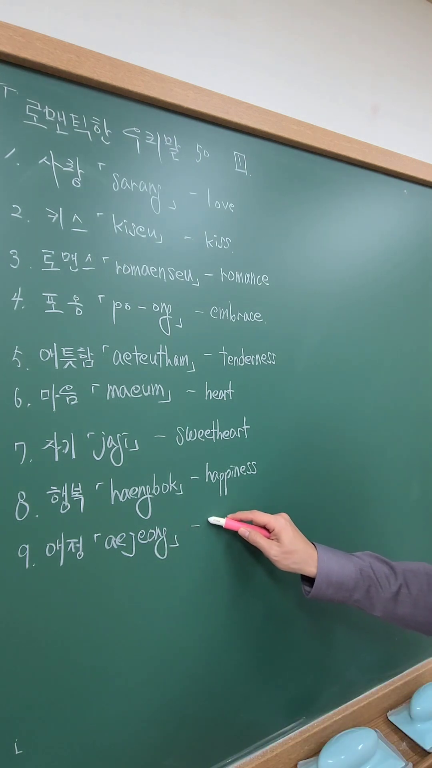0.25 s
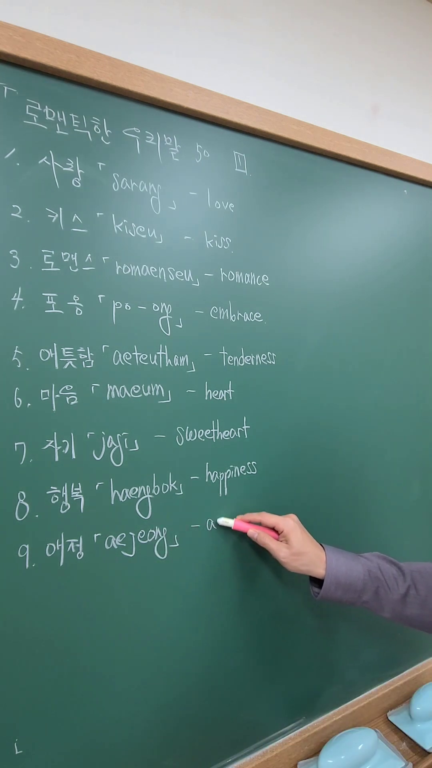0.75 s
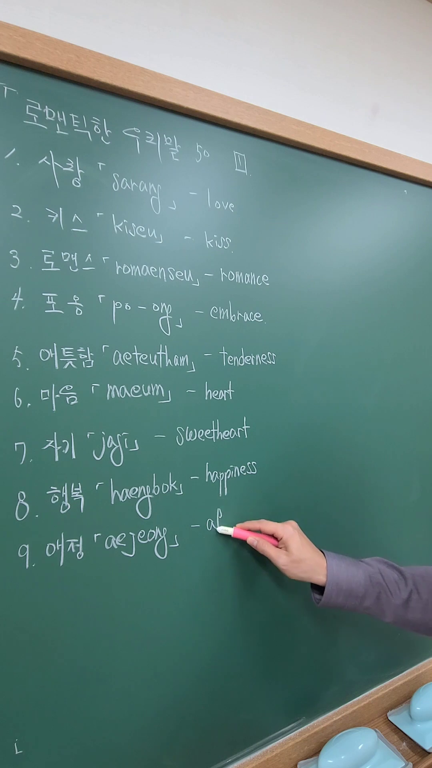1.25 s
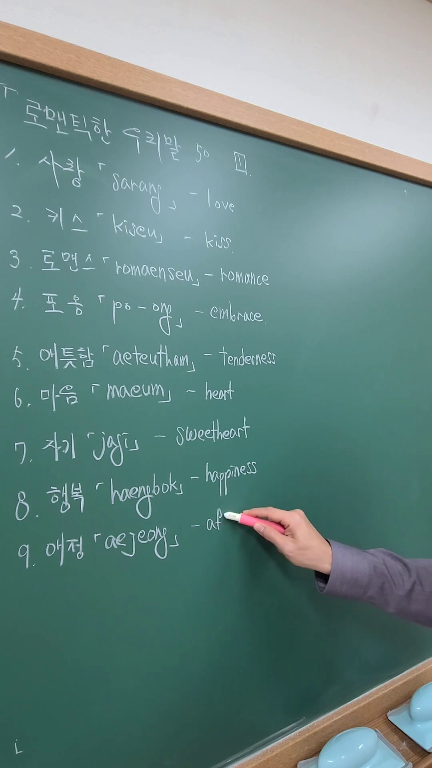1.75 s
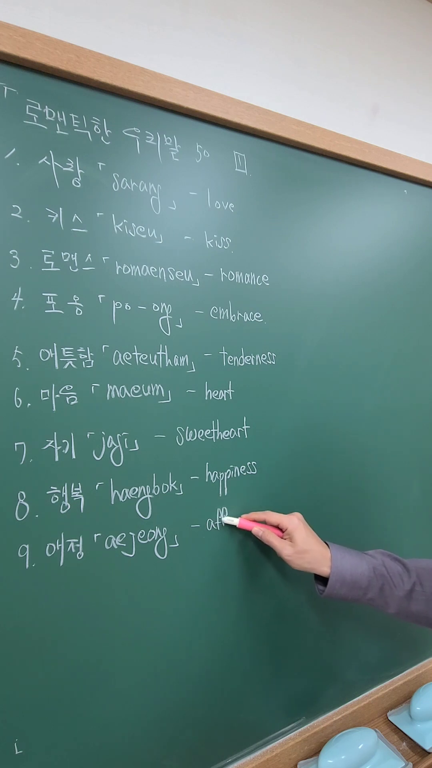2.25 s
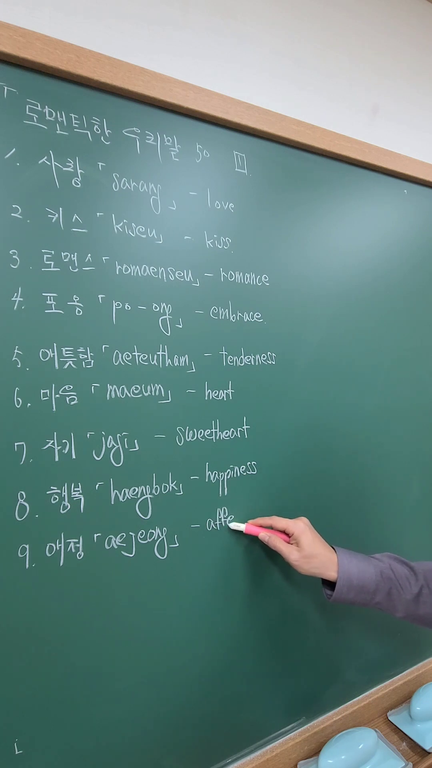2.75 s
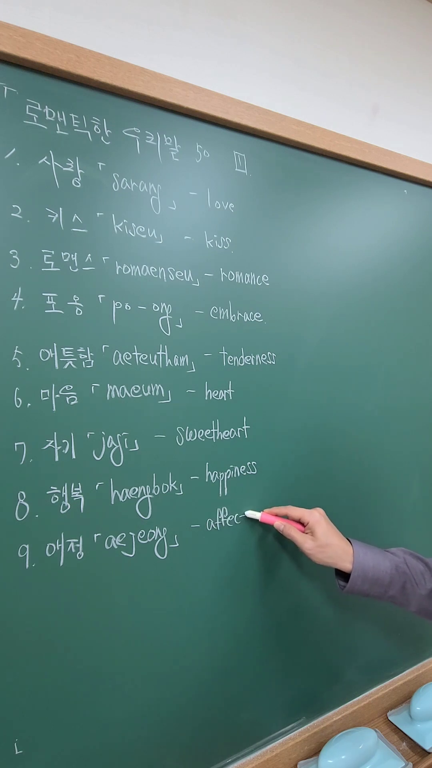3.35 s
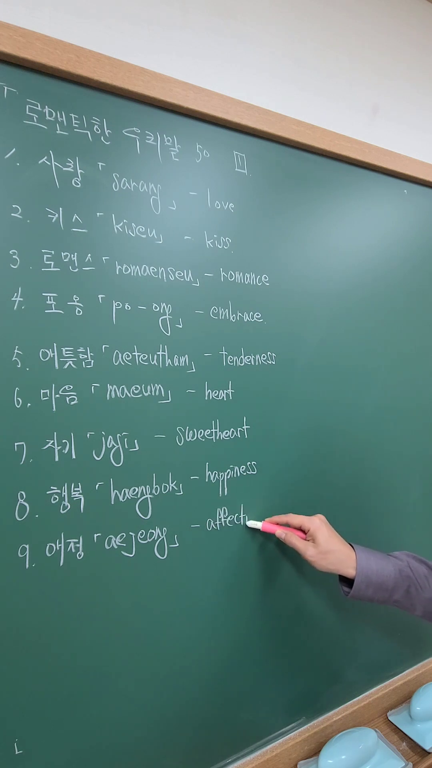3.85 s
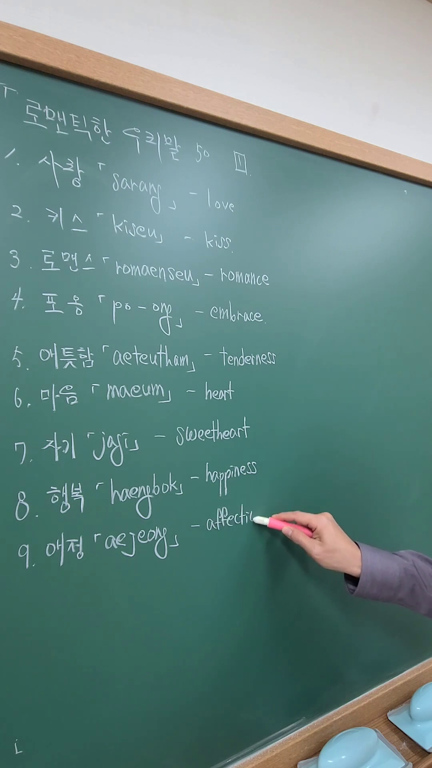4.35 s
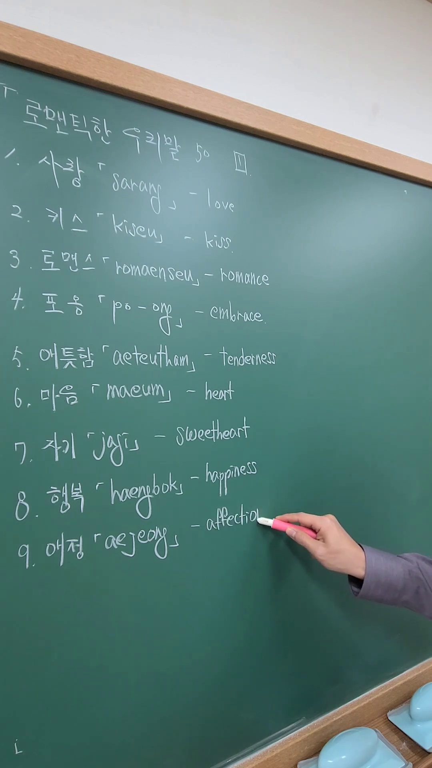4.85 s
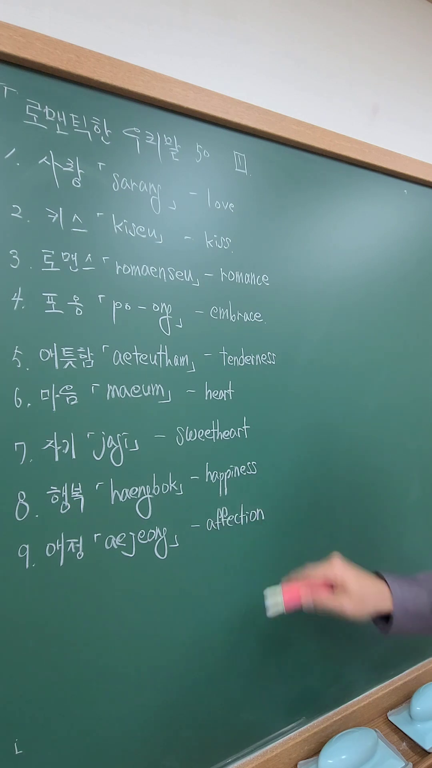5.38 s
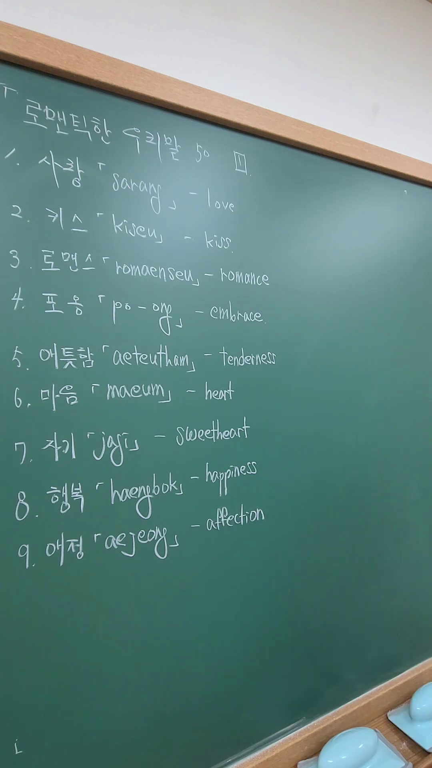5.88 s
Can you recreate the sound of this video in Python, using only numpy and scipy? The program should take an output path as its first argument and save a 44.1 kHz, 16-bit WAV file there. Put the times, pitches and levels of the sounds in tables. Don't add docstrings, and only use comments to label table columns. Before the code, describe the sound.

In a quiet, small-sounding room with an uneven low motor hum, chalk lands on a board in irregular taps, some crisp, some muted, with dry dusty scrapes between them. The panel answers briefly with a woody resonance. Finally the arm drops with a soft wide cloth rustle, a bright click and a duller one, leaving the hum. Close stereo pickup.

```python
import sys
import numpy as np
from scipy import signal
from scipy.fft import rfft, irfft, next_fast_len
from scipy.io import wavfile
from scipy.ndimage import uniform_filter1d, map_coordinates

SR = 44100
rng = np.random.default_rng(int(sys.argv[2]) if len(sys.argv) > 2 else 0)


def materialize(psi):
    bounded = np.clip(np.atleast_2d(psi).T, -1, 1)
    quanta = np.round(bounded * 32767).astype(np.int16)
    wavfile.write(sys.argv[1], SR, quanta)


def volts(x):
    e = np.asarray(x, float) / 20
    return 10 ** e


N = 269654


def unit(x):
    return x / np.sqrt(np.mean(x ** 2) + 1e-20)


def along(points, hz):
    f, v = np.transpose(points)
    return np.interp(np.log(hz + 1), np.log(f + 1), v)


def wobble(rate):
    knots = rng.standard_normal(int(N * rate / SR) + 4)
    return map_coordinates(knots, [np.arange(N) * rate / SR])


def filtered(x, response):
    n = x.shape[-1]
    m = next_fast_len(n + 8192)
    return irfft(rfft(x, m) * response(np.fft.rfftfreq(m, 1 / SR)), m)[..., :n]


def coloured(x, spectrum):
    return unit(filtered(x, lambda hz: volts(along(spectrum, hz))))


def add(track, s, sound):
    start = round(s * SR)
    sound = sound[..., max(-start, 0):]
    part = track[..., max(start, 0):][..., :sound.shape[-1]]
    part += sound[..., :part.shape[-1]]


def softened(x, bright_db):
    edge_hz = np.clip(9000 * volts(0.4 * (bright_db + 18.5)), 500, 20000)
    return signal.lfilter(*signal.butter(2, edge_hz, fs=SR), x)


# (f/Hz, t60/s)
DECAY = [(700, 0.53), (2000, 0.28), (5000, 0.19), (9000, 0.24), (15000, 0.24)]


def dying(spectrum, seconds, speed, channels):
    noise = coloured(rng.standard_normal((channels, round(seconds * SR))), spectrum)
    hz, t, z = signal.stft(noise, SR, nperseg=128)
    fade = volts(-60 * speed * t / along(DECAY, hz)[:, None])
    return signal.istft(z * fade, SR, nperseg=128)[1][:, :noise.shape[1]]


def walls(x, db):
    tail = dying([(100, -3.5), (15000, 0)], 0.073, speed=1.6, channels=2)
    tail = tail / np.linalg.norm(tail[0])
    late = np.pad(x, (220, 0))[None]
    return volts(db) * signal.fftconvolve(late, tail, axes=1)[:, :N]


# (f/Hz, width/Hz, level/dB)
STICK = [(2990, 310, -4), (3500, 130, 3), (3633, 33, 4), (3670, 440, -7), (4230, 230, -8.5)]


def stick(hz):
    response = 0
    for k, (centre, width, db) in enumerate(STICK):
        damping = 1j * hz * width
        response = response + (-1) ** k * volts(db) * damping / (centre * centre - hz * hz + damping)
    return response


# (t/s, peak level/dB, panel knock level/dB, stick ring level/dB, contact brightness/dB: lower means a
TAPS = [(0.3323, -41.5, 9.5, -3.5, -26.5), (0.933, -34, 2.5, -6, -33.5), (1.496, -32, 0, 3, -18.5),
        (1.7317, -31, 1, -27, -22.5), (2.288, -31.5, 0, -5.5, -21.5), (2.492, -37.5, 2.5, -4, -28.5),
        (3.021, -41.5, 5, -1.5, -47), (3.2928, -52.5, 10, -1, -47), (3.5969, -45, 4.5, -1.5, -47.5),
        (3.8718, -37, 1, -1, -31), (4.0985, -37, 4.5, -2, -32.5), (4.3122, -34.5, 0.5, -4, -28),
        (4.7686, -49, 9, -2, -45)]
EARLIER = [
    (-0.11, -37.5, 3.6, 6, -31),
]
# (f/Hz, level/dB, t60/s)
PANEL = [(186.3, -13, 1), (252, -18, 0.22), (303.4, -8.5, 0.75), (311.6, 7.5, 0.26), (334.2, 4.5, 0.32),
         (372.4, -5, 0.53), (412, -3.5, 0.55), (448, -13, 0.099), (496, -7.5, 0.13), (516, -3.5, 0.12),
         (642, -3.5, 0.19), (674, -17.5, 0.71), (700, -26, 0.07), (790, -53, 0.1), (908, -14.5, 0.22),
         (950, -5.5, 0.14)]
# (f/Hz, level/dB per Hz)
THUD = [(120, -42), (200, -36), (300, 4.5), (450, 0.5), (650, -3.5), (900, -15.5), (1500, -21), (2500, -46)]
# (f/Hz, level/dB per Hz)
CRACK = [(350, -12.5), (600, -4), (679, -15), (1210, -15), (1630, -11), (2490, -13), (3510, -11),
         (3970, -14), (6580, -17.5), (8770, -26.5), (15800, -19.5)]


def landings():
    near, around = np.zeros(N), np.zeros((2, N))
    t = np.arange(int(.4 * SR)) / SR
    for s, db, knock_db, ring_db, bright_db in [*TAPS, *EARLIER]:
        burst = rng.standard_normal((3, len(t)))
        tick = volts(-3 - 60 * t / 0.0024) * burst[0]
        crack = volts(-9.5 - 60 * t / 0.071) * coloured(burst[1], CRACK)
        shiver = volts(-10) * dying(CRACK, len(t) / SR, speed=1.77, channels=1)[0]
        rattle = volts(-60 * t / 0.011) + volts(-14.0 - 60 * t / 0.17)
        ring = volts(ring_db + 16) * filtered(rattle * burst[2], stick)
        hit = panel_knock(t, knock_db) + tick + crack + shiver + ring
        add(near, s, volts(db) * softened(hit, bright_db))
        late = (1 - np.exp(-t / 0.0013)) * dying(CRACK, len(t) / SR, speed=0.91, channels=2)
        add(around, s, volts(db - 9.0) * softened(late, bright_db))
    near = signal.sosfilt(signal.butter(4, 178, "high", fs=SR, output="sos"), near)
    return near, around + walls(near, db=-7)


def panel_knock(t, knock_db):
    hz, level_db, t60 = np.transpose(PANEL)[:, :, None]
    spot = rng.standard_normal((2, len(PANEL), 1))
    drift = 0.0053 * np.cumsum(rng.standard_normal((len(PANEL), len(t))), axis=1)
    phase = 2 * np.pi * hz * (1 + 0.0073 * spot[1]) * t + drift
    modes = volts(level_db + 1.66 * spot[0] - 66 * t / t60) * np.sin(phase)
    push = volts(11.5 - 60 * t / 0.013) * np.sin(2 * np.pi * 300 * t)
    swell = volts(6 - 60 * t / .26) * (1 - np.exp(-t / 0.0024))
    dense = swell * coloured(rng.standard_normal(len(t)), THUD)
    return -volts(knock_db - 11.5) * (modes.sum(axis=0) + push + dense)


# (f/Hz, level/dB per Hz)
DUST = [(120, -54), (200, -12.5), (316, -3), (644, -8.5), (1310, -20.5), (1700, -14), (2450, -22),
        (3400, -13.5), (4480, -19), (6570, -20), (8640, -28), (11800, -22.5), (15800, -27.5)]
# (f/Hz, level/dB per Hz)
GRIT = [(3800, -39), (4800, -8), (5600, 1.5), (6800, -2), (7600, -6.5), (8600, -38)]


def strokes():
    grains = rng.standard_normal((3, N)) * volts(2 * wobble(500) + 2 * wobble(60))
    hiss = volts(9) * bells(0.92, "hiss") * coloured(streaked(grains[0], depth_db=1.0), DUST)
    ring = volts(1.1) * bells(0.72, "ring") * unit(filtered(streaked(grains[1], depth_db=2.6), stick))
    grit = volts(-3.0) * bells(1, "grit") * coloured(streaked(grains[2], depth_db=3.5), GRIT)
    scrape = hiss + ring + grit
    return scrape, walls(scrape, db=-0.5)


# (middle t/s, length/s between the edges, hiss level/dB, stick ring and grit level/dB over the hiss)
STROKES = [(0.006, 0.083, -77, 8.2, -4), (0.102, 0.02, -88.5, 16, -0.7), (0.368, 0.091, -80.5, 7.5, 3),
           (0.477, 0.11, -70, 8.5, -3), (0.6, 0.076, -72.5, 7, 3), (0.744, 0.117, -76.1, 6, 2.0),
           (1.127, 0.12, -75, 1, -4), (1.271, 0.12, -67, 3, 1), (1.567, 0.14, -76, 8.5, 3),
           (1.928, 0.12, -73, -1, -9), (2.069, 0.13, -70.5, -14, -1.5), (2.355, 0.14, -77, 8.5, 6),
           (2.61, 0.252, -80.5, 0.5, -4), (2.791, 0.13, -74.5, -2, -4), (2.87, 0.094, -77.6, 6, 4),
           (3.125, 0.19, -75.5, 5, -2), (3.395, 0.126, -80.5, 6, 2.5), (3.706, 0.13, -70, 3, 3),
           (3.938, 0.083, -73.5, 6, 0), (4.184, 0.083, -82, 12, 6), (4.387, 0.12, -75, 7.5, 5),
           (4.504, 0.24, -75, 3.8, 2), (4.891, 0.11, -74.2, 4, 4.5), (5.059, 0.18, -77, 7, 6)]


def bells(follows, layer):
    edge_db = 10
    # 68 ms, hiss 49 dB under the landing
    grazes = [(s, 0.068, db - 49, 8.5, 0) for s, db, *_ in TAPS]
    middle, length, db, ring_db, grit_db = np.transpose([*STROKES, *grazes])[:, :, None]
    t = np.arange(0, N / SR, .002)
    speed_db = -edge_db * ((t - middle) / (length / 2)) ** 2
    over_db = {"hiss": 0, "ring": ring_db, "grit": grit_db}[layer]
    gain = np.sqrt(np.sum(volts(db + over_db + follows * speed_db) ** 2, axis=0))
    return np.interp(np.arange(N) / SR, t, gain)


def streaked(x, depth_db):
    z = signal.stft(x, nperseg=512)[2]
    field = uniform_filter1d(rng.standard_normal(z.shape), size=14, axis=1)
    return unit(signal.istft(z * volts(depth_db * unit(field)), nperseg=512)[1][:N])


# (t/s, level/dB)
THROB = [(0, -59), (.43, -52.5), (.7, -56.5), (.83, -52), (1, -56), (1.17, -51.5), (1.35, -57),
         (1.82, -53.5), (2.1, -60), (2.3, -53), (3.4, -56.5), (4.17, -54.5), (4.5, -54), (4.95, -53.5),
         (5.15, -59.5), (5.4, -54), (5.68, -58.5), (5.97, -52.5)]
# (f/Hz, level/dB per Hz)
RUMBLE = [(11, -42), (22, -2), (59, 5.5), (74, 1.5), (86, -6.5), (101, -34), (124, 1), (160, -44),
          (210, -68), (350, -120)]


def ventilation():
    t = np.arange(N) / SR
    throb_db = np.interp(t, *np.transpose(THROB))
    first = volts(throb_db - 4.5) * np.sin(2 * np.pi * 58.27 * t + 0.7 * wobble(5))
    shaft = volts(throb_db - 6.5) * np.sin(2 * np.pi * 45.3 * t + 1.16 * wobble(3.3))
    beat = np.abs(1 + 0.83 * np.exp(2j * np.pi * (t - 4.17) / .43))
    second_db = -61.5 + 1.05 * (t - t.mean()) + 1.16 * wobble(2.94)
    second = volts(second_db) * beat * np.sin(2 * np.pi * 120.3 * t + 1.1 * wobble(7.2))
    rumble = volts(throb_db - 1.5) * coloured(rng.standard_normal((2, N)), RUMBLE)
    return first + shaft + second, rumble


# (f/Hz, level/dB per Hz)
FLOOR = [(98, -19.5), (130, -8), (165, -17), (290, -25), (348, -23.5), (598, -26), (731, -29), (1030, -28),
         (1340, -31.5), (1960, -38.5), (5130, -44.5), (8140, -57), (11700, -51), (15800, -48)]


def floor():
    return volts(-60.5 + 0.73 * wobble(2.84)) * coloured(rng.standard_normal((2, N)), FLOOR)


# (peak t/s, rustle level/dB, rise/s over 20 dB, fall/s over 20 dB)
SLEEVE = [
    (5.184, -62, 0.03, 0.096),
    (5.295, -86, 0.017, 0.045),
    (5.613, -80, .04, .08),
    (5.74, -77, 1, 1.5),
]
# (f/Hz, level/dB per Hz)
CLOTH = [(350, -36), (600, -13), (1220, -13.5), (1330, -12.5), (2030, -13), (6580, -13.5), (9270, -27),
         (10500, -17), (15800, -19.5)]


def sleeve():
    peak, db, rise, fall = np.transpose(SLEEVE)[:, :, None]
    after = np.arange(N) / SR - peak
    brushes = volts(db - 20 * np.maximum(-after / rise, after / fall)).sum(axis=0)
    rustle = brushes * volts(5.5 + 1.1 * wobble(40))
    return rustle * coloured(rng.standard_normal((2, N)), CLOTH)


# (t/s, peak level/dB, brightness level/dB)
CLICKS = [
    (5.182, -45.5, -8.5),
    (5.609, -51.5, -20),
]


def holder():
    tick, rustle = np.zeros(N), np.zeros((2, N))
    t = np.arange(900) / SR
    for s, db, bright_db in CLICKS:
        tone = [(300, -0.5), (1700, -9), (2600, -12), (3500, .6 * bright_db - .8), (4600, -12.5),
                (9000, bright_db - 10), (15000, bright_db)]
        snap = coloured(rng.standard_normal(len(t)), tone)
        add(tick, s, volts(db + bright_db + 12.5 - 60 * t / 0.0057) * snap)
        scatter = dying(tone, 0.28, speed=0.99, channels=2)
        add(rustle, s, volts(db - 7.0) * softened(scatter, bright_db))
    return tick, rustle


# (f/Hz, left minus right level/dB)
SHADOW = [(300, -1), (1000, 3), (2500, -4.5), (6000, -14.5), (13000, -18.5)]
# (f/Hz, phase/rad)
DETOUR = [(350, 0.1), (700, 0.47), (1300, 1.58), (2000, 0.089)]


def direct(x):
    def tilt(hz):
        late = 2 * np.pi * hz * 4.56 / SR + along(DETOUR, hz)
        return along(SHADOW, hz) * np.log(10) / 40 - .5j * late
    return filtered(np.array([x, x]), lambda hz: np.exp([tilt(hz), -tilt(hz)]))


# (f/Hz, left-right likeness)
ALIKE = [(60, 0.98), (200, 0.85), (500, 0.23), (1000, -0.058), (1600, -0.14), (3000, 0.22), (12000, -0.11)]


def diffuse(pair):
    def weights(hz):
        turn = np.arccos(np.clip(along(ALIKE, hz), -1, 1)) / 2
        return np.array([np.cos(turn), np.sin(turn)])
    mid, side = filtered(pair, weights)
    return np.array([mid + side, mid - side])


def scene():
    near, around = zip(landings(), strokes(), ventilation(), holder())
    return direct(sum(near)) + diffuse(sum(around) + floor() + sleeve())


def roll_off(x):
    return signal.sosfilt(signal.butter(12, 16430, fs=SR, output="sos"), x)


# (f/Hz, level/dB)
PORT = [(7300, 0), (7700, -3.5), (10300, -5), (10800, -0.5)]


def record(dry):
    mix = filtered(dry, lambda hz: volts(along(PORT, hz)) * (hz < 15780))
    return roll_off(mix)


dry = scene()
out = record(dry)
materialize(out)
```